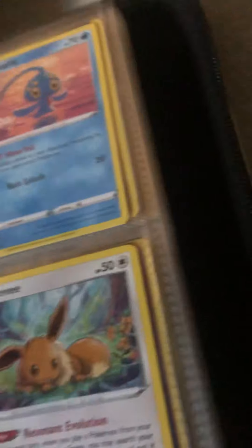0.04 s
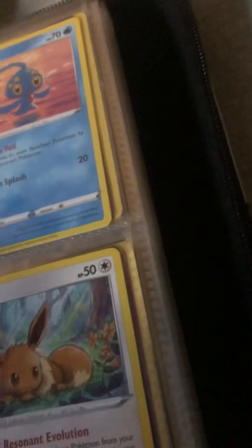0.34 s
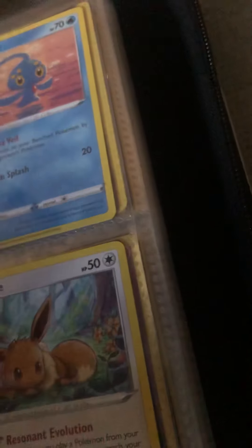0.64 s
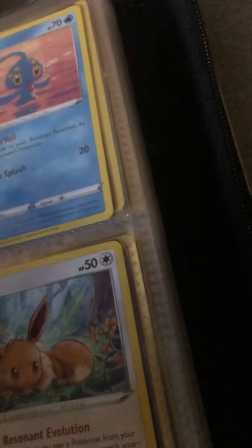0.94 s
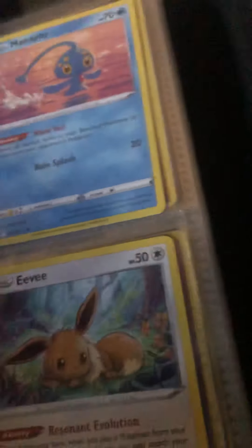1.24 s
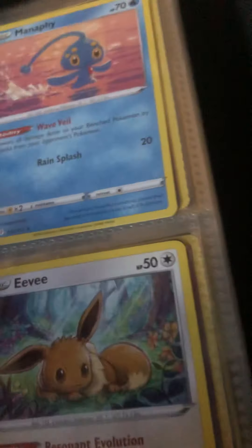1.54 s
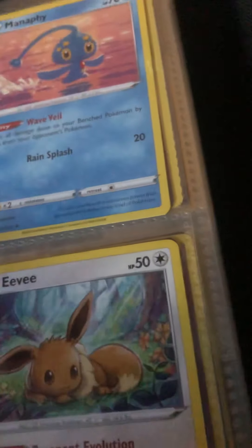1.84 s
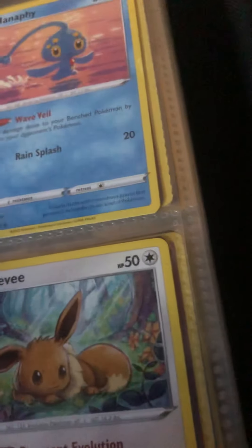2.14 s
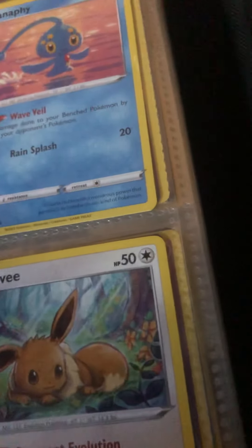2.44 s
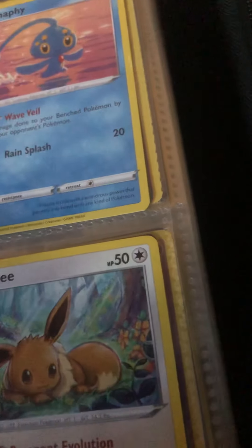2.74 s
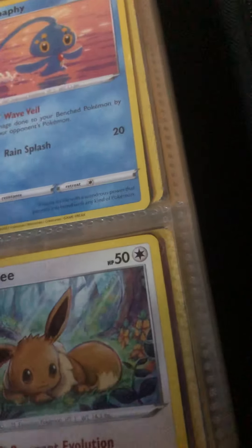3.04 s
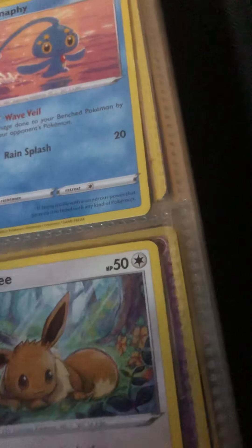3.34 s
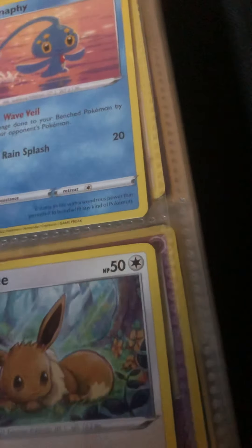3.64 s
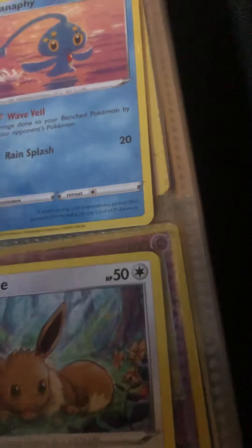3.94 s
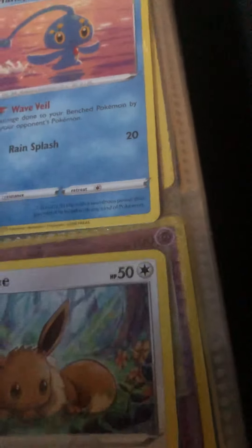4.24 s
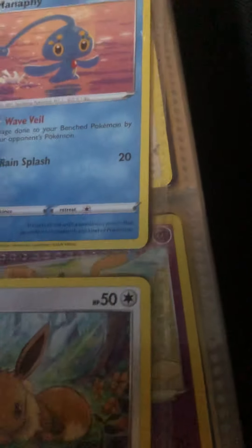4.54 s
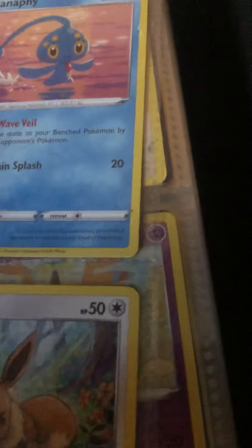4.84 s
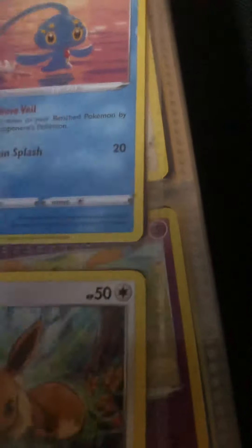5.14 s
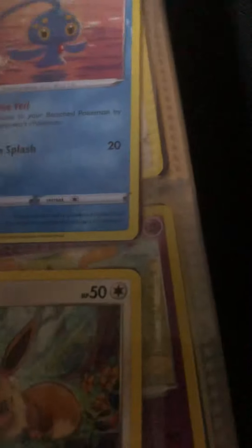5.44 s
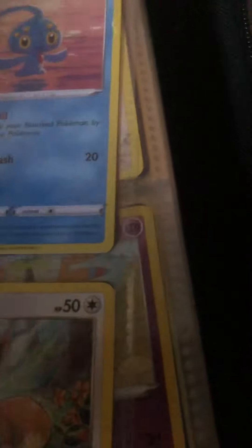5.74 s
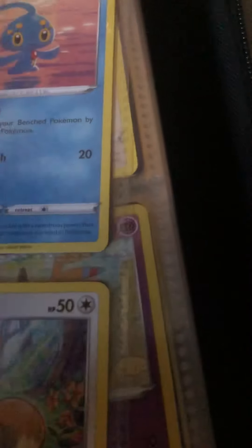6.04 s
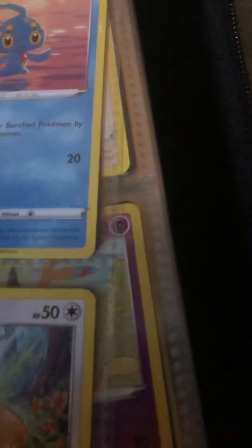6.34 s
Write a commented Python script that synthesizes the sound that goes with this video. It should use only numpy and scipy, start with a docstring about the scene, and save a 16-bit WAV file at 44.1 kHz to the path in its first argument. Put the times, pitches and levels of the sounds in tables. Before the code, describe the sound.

Plastic pocket pages full of trading cards are handled close to the microphone in a quiet room. Light, scattered crackles come first, then a short pause. The crinkling returns and builds to a cluster of sharp snaps with brief card scrapes, followed by a soft hissing slide and a few last ticks. The binder bumps dully now and then, and an appliance hums very faintly behind.

```python
"""Plastic pocket pages full of trading cards snap and crinkle, handled close by in a quiet room.
Each snap is a crease in the plastic film buckling and sending bending waves through the sheet.
Cards and sleeves catch and slip as they slide, making short scuffs, scrapes and one long glide.
The binder bumps softly when it is nudged, and an appliance hums faintly behind it all."""
import sys
import numpy as np
from scipy import signal
from scipy.fft import rfft, irfft
from scipy.io import wavfile
from scipy.ndimage import map_coordinates

SR = 44100
rng = np.random.default_rng(int(sys.argv[2]) if len(sys.argv) > 2 else 0)


def file_out(sig):
    """Save sig as 16-bit WAV at sys.argv[1]."""
    # one column per channel
    cols = np.atleast_2d(sig).T
    # limit, then scale
    lim = np.clip(cols, -1, 1)
    pcm = np.round(lim * 32767).astype(np.int16)
    wavfile.write(sys.argv[1], SR, pcm)


N = 290178
LEAD_S = 0.004  # how long a crease creaks before it jumps


def undb(db):
    """Turn decibels into a number to multiply by."""
    return 10 ** (np.asarray(db) / 20)


def unit(x):
    """Scale a sound to an average (rms) level of 1."""
    return x / np.sqrt(np.mean(x ** 2) + 1e-30)


def freqs(x):
    """The frequencies in the spectrum of x, never below 1 Hz."""
    return np.maximum(np.fft.rfftfreq(len(x), 1 / SR), 1)


def add(out, start_s, x):
    """Mix x into out, beginning at start_s."""
    i = int(start_s * SR)
    a, b = max(i, 0), min(i + len(x), N)
    if b > a:
        out[a:b] += x[a - i:b - i]


def colour(x, points):
    """Shape the tone of x along a curve of (frequency [Hz], level [dB]) points."""
    hz, db = np.transpose(points)
    gain = undb(np.interp(np.log(freqs(x)), np.log(hz), db))
    cepstrum = irfft(np.log(gain), len(x))
    # folding this in half makes the filter ring after a click, not before it
    cepstrum[1:len(x) // 2] *= 2
    cepstrum[len(x) // 2 + 1:] = 0
    return irfft(rfft(x) * np.exp(rfft(cepstrum)), len(x))


def resonance(f, hz, q):
    """How something that rings at hz answers each frequency; a higher q rings longer."""
    return 1 / (1 + 1j * q * (f / hz - hz / f))


def peaks(modes):
    """A tone curve with one steep peak for each (frequency [Hz], width [Hz], level [dB])."""
    f = np.geomspace(100, 20000, 600)
    power = sum(undb(db) ** 2 * np.abs(resonance(f, hz, hz / width)) ** 4 for hz, width, db in modes)
    return np.c_[f, 10 * np.log10(power)]


# tone of the room's air: (frequency [Hz], relative level [dB])
AIR_TONE = [(20, -64), (32, -35), (45, -11.5), (115, -14.5), (190, -7.5), (280, -11.5), (450, -16),
            (850, -22), (2300, -24), (3600, -27.5), (8100, -34.5), (16000, -40.5)]


def room_air(level_db=-63.5):
    """Still air makes a faint, low rush."""
    return undb(level_db) * unit(colour(rng.standard_normal(N), AIR_TONE))


# the notes in the appliance's hum: (frequency [Hz], level [dB])
HUM_NOTES = [(94.3, -78), (188.7, -67), (377.4, -90), (943, -78), (1509, -82.5)]


def appliance_hum(waver=0.032):
    """An appliance hums a few steady notes that waver slightly in loudness and pitch."""
    t, out = np.arange(N) / SR, np.zeros(N)
    slow = [(2, 0), (8, -10), (60, -70), (400, -120)]
    for hz, db in HUM_NOTES:
        swell = unit(colour(rng.standard_normal(N), slow))
        drift = unit(colour(rng.standard_normal(N), slow))
        note = np.sqrt(2) * np.sin(2 * np.pi * hz * t + hz / 600 * drift)
        out += undb(db) * (1 + waver * swell) * note
    return out


def room_echo(x, echo_db=-22, die_away_s=0.19, delay_s=0.0086):
    """A small furnished room adds a weak, short, duller echo."""
    t = np.arange(SR // 2) / SR
    tail = rng.standard_normal(len(t)) * undb(-60 * t / die_away_s) * (t > delay_s)
    tail = colour(tail, [(150, 6.5), (600, -8.5), (1250, -3.5), (2300, -4.5), (6000, -7), (14000, -3.5)])
    return x + undb(echo_db) * signal.fftconvolve(x, tail / np.linalg.norm(tail))[:N]


def hardness(db, soft_db=-31, hard_db=-21):
    """How hard a snap is: 0 for soft, 1 for hard, below 0 for fainter ones."""
    return (db - soft_db) / (hard_db - soft_db)


def after_snaps(soft_db, hard_db, fade_s, attack_s):
    """A loudness curve that swells and fades after each single snap, more after a hard one."""
    t, out = np.arange(SR // 4) / SR, np.zeros(N)
    shape = (1 - np.exp(-t / attack_s)) * np.exp(-t / fade_s)
    for time_s, db, *_ in FILM_SNAPS:
        add(out, time_s, undb(soft_db + (hard_db - soft_db) * hardness(db)) * shape)
    return out


# soft pushes on the binder: (time [s], level [dB], fade [s], ring of the cover [Hz])
BINDER_NUDGES = [(0.899, -54, 0.02, 187), (1.664, -51, 0.008, 280), (1.701, -53, 0.0055, 260),
                 (1.898, -52.5, 0.011, 200), (3.191, -44, 0.011, 169), (4.221, -50, 0.033, 130),
                 (5.101, -50, 0.02, 184), (5.107, -51.5, 0.012, 520), (5.171, -55, 0.061, 153),
                 (5.24, -55, 0.022, 160), (5.341, -61, 0.15, 140), (5.42, -63, 0.09, 65),
                 (5.918, -55.5, 0.04, 250), (6.002, -52.5, 0.02, 260), (6.15, -48, 0.0067, 200)]


def binder_bumps(attack_s=0.00033, ring_gain=3.1):
    """The padded cover bumps dully at a snap or a push; its note depends on where it is pushed."""
    t = np.arange(SR // 2) / SR
    cover = [(30, -32), (60, -5.5), (105, -6.5), (155, 2), (330, -7), (510, -1.5),
             (850, -39), (4000, -35)]
    bumps = after_snaps(soft_db=-52, hard_db=-39, fade_s=0.0088, attack_s=attack_s)
    out = bumps * unit(colour(rng.standard_normal(N), cover))
    for time_s, db, fade_s, hz in BINDER_NUDGES:
        rumble = colour(rng.standard_normal(len(t)), cover)
        ring = 1 + ring_gain * resonance(freqs(t), hz, q=4)
        thud = unit(irfft(rfft(rumble) * ring, len(t)))
        shape = (1 - np.exp(-t / attack_s)) * np.exp(-t / fade_s)
        add(out, time_s, undb(db) * shape * thud)
    return out


def friction(t, tone, pocket_hz, slips_per_s, spread_db, smooth, hollow, grip_db=1, grip_s=0.007):
    """Rubbing is many tiny, uneven slips under a wavering grip, echoing inside the pocket."""
    count = len(t)
    sizes = rng.standard_normal(count) * undb(spread_db * np.minimum(rng.exponential(size=count), 4))
    slips = unit((rng.random(count) < slips_per_s / SR) * sizes)
    rubbing = slips + smooth * rng.standard_normal(count)
    grip = undb(grip_db * np.interp(t / grip_s, np.arange(count), rng.standard_normal(count)))
    echoes = 1 / (1 - hollow * np.exp(-2j * np.pi * freqs(t) / pocket_hz))
    return unit(colour(irfft(rfft(rubbing * grip) * echoes), tone))


# rasp of a card edge: (frequency [times the pocket's ring], relative level [dB])
RASP_TONE = [(.08, -45.5), (.33, -4), (.55, -3.5), (.75, 1.5), (1, 4.5), (1.5, -1), (2.5, -7), (5, -28),
             (13, -28)]
# hiss of film on film: (frequency [Hz], relative level [dB])
HISS_TONE = [(500, -5.5), (2000, -1.5), (3100, 0.5), (4200, 1.5), (5900, 1), (6600, -5), (7700, -5),
             (10300, -8), (12500, -9), (16000, -14.5)]
# short slides: (peak time [s], rise [s], fall [s], rasp [dB], hiss [dB], ring of the pocket [Hz])
SLIDE_STROKES = [ (0.04, 0.085, 0.13, -66, -61.5, 1550), (0.3, 0.12, 0.29, -76, -76, 1450),
                 (.875, 0.037, .035, -65, -78, 1700), (.965, 0.036, .035, -64, -74, 1700),
                 (1.215, 0.005, .02, -65, -72, 2100), (1.89, 0.0068, 0.0037, -47.5, -56, 1750),
                 (1.9, 0.0035, 0.0046, -57, -60, 1690), (2.05, 0.1, 0.26, -78, -77, 1400),
                 (3.19, 0.07, 0.054, -58, -60.5, 1190), (3.445, 0.03, 0.064, -55.5, -58.5, 1310),
                 (3.6, 0.2, 0.16, -72, -70, 1400), (3.569, 0.039, 0.02, -54, -58, 1560),
                 (3.70, 0.024, 0.015, -60.5, -56.5, 1450), (4.008, 0.031, 0.034, -52, -57.5, 1200),
                 (4.262, 0.0083, 0.21, -63, -66.5, 1180), (4.53, 0.021, 0.032, -48, -68, 1000),
                 (4.615, 0.034, 0.046, -49.5, -56, 1150), (4.672, 0.013, 0.013, -61, -57.5, 2300),
                 (5.039, 0.11, 0.035, -78, -59.5, 1150), (5.101, 0.035, 0.022, -64.5, -60.5, 1000),
                 (5.681, 0.014, 0.022, -65, -54.5, 1500), (5.189, 0.026, 0.0085, -81, -59, 1540),
                 (5.744, 0.0062, 0.014, -68, -51.5, 1170), (5.91, 0.045, 0.043, -74, -57, 1430),
                 (6, 0.021, 0.033, -73, -53.5, 1120), (6.204, 0.022, 0.0075, -55.5, -44, 2130),
                 (6.145, 0.0093, 0.012, -61, -60, 1400), (6.343, 0.0033, 0.0055, -51, -43.5, 2150),
                 (6.516, 0.042, 0.047, -61.5, -60.5, 1050)]


def short_slides(rise_db=11, fall_db=9, edge_share=0.13, tight_db=7.5):
    """Each stroke speeds up, slows and sticks again; a tight pocket hisses brighter."""
    t, out = np.arange(16384) / SR, np.zeros(N)
    hiss_hz, hiss_shape_db = np.transpose(HISS_TONE)
    for peak_s, rise_s, fall_s, rasp_db, hiss_db, pocket_hz in SLIDE_STROKES:
        length_s = rise_s + fall_s
        contact = np.clip(np.minimum(t, length_s - t) / (edge_share * length_s), 0, 1)
        speed = contact * undb(np.interp(t, [0, rise_s, length_s], [-rise_db, 0, -fall_db]))
        tilt_db = tight_db * np.log2(pocket_hz / 1250) * np.log2(hiss_hz)
        rasp = friction(t, np.multiply(RASP_TONE, [pocket_hz, 1]), pocket_hz,
                        slips_per_s=2100, spread_db=-0.5, smooth=0.61, hollow=0.21)
        hiss = friction(t, np.c_[hiss_hz, hiss_shape_db + tilt_db], pocket_hz,
                        slips_per_s=4200, spread_db=3.5, smooth=0.52, hollow=0.061)
        add(out, peak_s - rise_s, speed * (undb(rasp_db) * rasp + undb(hiss_db) * hiss))
    return out


# where a tight pocket rings: (frequency [Hz], width [Hz], relative level [dB])
POCKET_RINGS = [(1050, 420, -6), (2080, 500, -6.5), (2880, 1000, -8.5), (4270, 700, -7), (5620, 450, -10),
                (6200, 310, -13), (7140, 1350, -17), (9300, 1300, -21), (11300, 1700, -23),
                (12600, 700, -24), (14400, 1300, -29)]
# card scrapes; a negative swell is a fade:
# (start [s], length [s], final level [dB], swell [dB], ring of the card edge [Hz])
EDGE_SCRAPES = [(4.747, 0.057, -46.5, 10.5, 1090), (4.837, 0.013, -56, -7, 1290),
                (4.86, 0.034, -33.5, 7, 1250), (5.321, 0.066, -48, 5, 955)]


def card_scrapes(ramp_s=0.0034, edge_width_hz=520):
    """A card edge rasps through a tight pocket, swelling or fading until it stops."""
    t, out = np.arange(8192) / SR, np.zeros(N)
    for start_s, length_s, db, swell_db, edge_hz in EDGE_SCRAPES:
        contact = np.clip(np.minimum(t, length_s - t) / ramp_s, 0, 1)
        pressure = contact * undb(np.interp(t, [0, length_s], [-swell_db, 0]))
        tone = peaks([(edge_hz, edge_width_hz, 0), *POCKET_RINGS])
        rasp = friction(t, tone, edge_hz, slips_per_s=3200, spread_db=-2, smooth=1, hollow=0, grip_db=1.2)
        add(out, start_s, undb(db) * pressure * rasp)
    return out


# where a card's sleeve rings: (frequency [Hz], width [Hz], relative level [dB])
SLEEVE_RINGS = [(1000, 810, -0.5), (1990, 900, 4), (2570, 330, -2), (4200, 1550, 4.5), (5670, 980, 7),
                (7740, 1300, -2.5), (9400, 1000, -1), (11400, 2000, -3), (13000, 1300, -3),
                (14700, 1400, -10)]


def card_glide(start_s=5.387, level_db=-53.5, attack_s=0.02, hold_s=0.23, fade_db_per_s=105):
    """A card slides lightly under the film, holds its speed, gets a last push and dies away."""
    t, out = np.arange(32768) / SR, np.zeros(N)
    slowing_s = np.maximum(t - attack_s - hold_s, 0)
    thumb_push_db = 5 * np.exp(-((t - 0.227) / 0.015) ** 2)
    speed = np.minimum(t / attack_s, 1) * undb(level_db + thumb_push_db - fade_db_per_s * slowing_s)
    hiss = friction(t, peaks(SLEEVE_RINGS), pocket_hz=1900, slips_per_s=5700,
                    spread_db=2.5, smooth=0.65, hollow=0, grip_db=0.5, grip_s=0.006)
    # the gap ahead of the card closes, so its breathy whistle climbs
    open_hz, closed_hz, width_hz, closing_s, whistle_db = 4450, 7500, 770, 0.14, -8
    gap_hz = open_hz + (closed_hz - open_hz) * np.minimum(t / closing_s, 1) ** 2
    steady = colour(rng.standard_normal(len(t)), peaks([(closed_hz, width_hz, 0)]))
    whistle = unit(map_coordinates(steady, [np.cumsum(gap_hz / closed_hz)]))
    add(out, start_s, speed * unit(hiss + undb(whistle_db) * whistle))
    return out


def film_rustle(pocket_hz=1400, hiss_db=-4):
    """The film rustles briefly as it relaxes after each single snap."""
    t = np.arange(N) / SR
    rasp_tone = np.multiply(RASP_TONE, [pocket_hz, 1])
    rasp = friction(t, rasp_tone, pocket_hz, slips_per_s=280, spread_db=0.5, smooth=0.3, hollow=0.12)
    hiss = friction(t, HISS_TONE, pocket_hz, slips_per_s=1300, spread_db=1, smooth=0.5, hollow=0.17)
    loudness = after_snaps(soft_db=-48, hard_db=-36.5, fade_s=0.0043, attack_s=0.00069)
    return loudness * (rasp + undb(hiss_db) * hiss)


# tone of the page as it ticks or snaps: (frequency [Hz], relative level [dB])
PAGE_TONE = [(60, -35), (200, -10), (480, -0.5), (750, -1.5), (1050, 5), (1600, 2.5), (2200, 2), (3000, -3),
             (4300, -3.5), (6200, -5.5), (7600, -1), (10400, -11.5), (12500, -7.5), (16000, -20)]


def stray_ticks(ticks_per_s=14, tick_db=-44, spread_db=4, rest_from_s=2, rest_until_s=3):
    """The film ticks faintly under the fingers, except while they rest."""
    t = np.arange(N) / SR
    handled = (t < rest_from_s) | (t > rest_until_s)
    ticks = handled * (rng.random(N) < ticks_per_s / SR)
    sizes = undb(tick_db + spread_db * np.clip(rng.standard_normal(N), -2, 2))
    return colour(ticks * sizes, PAGE_TONE)


def seam_echoes(t, strength=0.014, cycles=3.5):
    """Spectrum of a click echoing off the pocket seams; every octave lasts the same few cycles."""
    out = (t == 0) * 1.
    for hz in 250 * 2. ** np.arange(6):
        band = irfft(rfft(rng.standard_normal(len(t))) * resonance(freqs(t), hz, q=0.89))
        out += strength * np.sqrt(hz / 1000) * band * np.exp(-t * hz / cycles)
    return rfft(out)


# borders of a snap's five bands, low to high, called bass, body, bite, fizz and top: (frequency [Hz])
SNAP_BAND_EDGES = [250, 750, 2500, 6000, 10500, 16000]


def balance_bands(x, levels_db, average_s=0.005):
    """Reshape a snap's tone in three passes, bringing each band close to its level."""
    f, edges = freqs(x), np.array(SNAP_BAND_EDGES)
    centres = np.sqrt(edges[:-1] * edges[1:])
    for _ in range(3):
        energy = np.histogram(f, edges, weights=np.abs(rfft(x)) ** 2)[0] * 2 / len(x)
        current_db = 10 * np.log10(energy / (average_s * SR))
        x = colour(x, np.c_[centres, levels_db - current_db])
    return x


def snap(db, bass_db, bite_db, fizz_db, top_db, crease_hz, gap_hz, bounce, size=4096):
    """One buckle: the crease creaks, jumps, then gives way in tiny slips."""
    t = np.arange(size) / SR
    f, since_jump = freqs(t), t - LEAD_S
    # the loudest creases lie together close by (0), the softer ones all over the page (1)
    far = np.interp(db, [-38, -30], [1, 0])
    give_s = 0.0016 * 0.25 ** max(hardness(db), 0)  # a hard buckle gives way faster
    creak = far * 0.073 * np.exp(-np.abs(since_jump) / 0.0016)
    giving_way = np.exp(-np.abs(since_jump) / give_s)
    slipping = np.where(since_jump < 0, creak, giving_way)
    force = 0.21 * rng.standard_normal(size) * slipping * give_s / 0.001
    force[int(LEAD_S * SR)] += 2  # the jump itself
    crease_ring = 1 + (0.86 + 0.74 * far) * resonance(f, crease_hz, q=8.3 - 1.8 * far)
    spectrum = rfft(colour(force, PAGE_TONE)) * seam_echoes(t) * crease_ring
    # a bounce across the gap to the card behind the film hollows the treble
    spectrum *= 1 + min(bounce, 0.9) * np.exp(-2j * np.pi * f / gap_hz)
    # low bending waves travel slowly and arrive late: a falling chirp
    lag_s = 0.00457 / (1 + f / 300)
    spectrum *= np.exp(-2j * np.pi * np.cumsum(lag_s - lag_s[size // 8]) * SR / size)
    return balance_bands(irfft(spectrum), db + np.array([bass_db, 0, bite_db, fizz_db, top_db]))


# runs of small snaps; fizz and top are relative to the body:
# (start [s], end [s], snaps [count], body [dB], fizz [dB], top [dB], ring of the creases [Hz])
FOLD_RUNS = [(0.743, 0.784, 3, -62, -14, -21, 1660), (0.856, 0.889, 4, -57, -12, -18, 2200),
             (0.938, 0.966, 4, -60, -23, -28, 1820)]


def travelling_folds(gap_hz=4100, jitter=0.12, spread_db=3, spread_octaves=0.45):
    """A fold travels along the film and pops one crease after another at a nearly even pace."""
    out = np.zeros(N)
    for start_s, end_s, count, db, fizz_db, top_db, crease_hz in FOLD_RUNS:
        times, step_s = np.linspace(start_s, end_s, count, retstep=True)
        for time_s, (late, softer, higher, tighter) in zip(times, rng.standard_normal((count, 4))):
            pop = snap(db - spread_db * softer, bass_db=-13, bite_db=-4, fizz_db=fizz_db, top_db=top_db,
                       crease_hz=crease_hz * 2 ** (spread_octaves * higher),
                       gap_hz=gap_hz * 2 ** (spread_octaves * tighter), bounce=0.37)
            add(out, time_s + jitter * step_s * late - LEAD_S, pop)
    return out


# single snaps of the film; bass, bite, fizz and top are relative to the body:
# (time [s], body [dB], bass [dB], bite [dB], fizz [dB], top [dB], ring of the crease [Hz],
#  ring of the gap behind it [Hz], bounce across that gap [0-1])
FILM_SNAPS = [(0.318, -65.5, -1, 2, -3, -9.5, 1640, 5090, 0.22),
              (0.604, -65, -10, -1, -1.5, -3, 940, 3130, 0.2),
              (0.656, -51.5, -10.5, -4.5, -9, -14, 3150, 5100, 0.4),
              (0.8437, -54.5, -17, -10.5, -21, -31.0, 1580, 2310, 0.22),
              (0.877, -58.5, -4, -2, -8, -19, 1530, 2310, 0.22),
              (0.8983, -53.5, -13, -3, -11.0, -17, 2080, 4600, 0.17),
              (0.9582, -54.5, -13.0, -5, -11.5, -34, 3040, 5090, 0.2),
              (0.9738, -47, -19, 1, -4, -12, 850, 4560, 0.14),
              (0.9753, -50.5, -10, -4.5, -6, -14, 1750, 4400, 0.23),
              (1.0618, -59, -7, -3, -24, -27.5, 1430, 3460, 0.2),
              (1.1513, -59, -14, -1.5, -7, -8, 2390, 3030, 0.2),
              (1.1668, -57, -8, -2, -17.5, -22.0, 2650, 3240, 0.67),
              (1.186, -55, -16.0, -4.5, -21, -23.0, 1240, 2690, 0.4),
              (1.2007, -42.5, -17, 1, -16, -19, 2550, 2770, 0.6),
              (1.2032, -43, -22, -9, -12.5, -8.5, 1160, 2880, 0.57),
              (1.2338, -43.5, -22, -7, -11.5, -10, 2310, 5250, 0.28),
              (1.549, -54, -9, -3.0, -4.5, -21, 3260, 5260, 0.83),
              (1.6587, -45, -15, -10, -22, -35, 3150, 4600, 1),
              (1.664, -50, -14, -4, -14, -30.5, 3260, 5260, 0.26),
              (1.682, -59, -9, -6.0, -5.5, -22, 850, 5440, 0.4),
              (1.694, -53, -17, -9.0, -20.0, -35.5, 1480, 3290, 0.2),
              (1.697, -54, -7, -8, -27, -34.0, 850, 5000, 0.4),
              (1.7455, -56.5, -17, -5.0, -2.5, -7.0, 1690, 5260, 0.4),
              (1.8843, -53, -8, -3.5, -1.5, -10, 1580, 2250, 0.43),
              (1.8985, -54, -5, -8, -14, -17, 1900, 3600, 0.27),
              (3.0186, -51, -11.5, -0.5, -16.0, -35.5, 1750, 3150, 0.2),
              (3.05, -50, -12.0, -6, -30.0, -28.0, 3370, 2200, 0.35),
              (3.0997, -42, -11.5, -6, -20, -20, 1580, 5260, 0.2),
              (3.1087, -41.0, -10.5, -3.5, -26, -24.0, 3370, 2180, 0.31),
              (3.1323, -45, -13, 2, -10.0, -14.0, 1580, 3160, 0.59),
              (3.158, -57, -8, -1.0, -3, 0.0, 1880, 5000, 0.67), (3.1639, -52, -4, 1, 1, 2, 910, 2470, 0.2),
              (3.1757, -54, -2, 0.0, 2, -4, 850, 5000, 0.4),
              (3.1869, -36.5, -10, -6.5, -3, -8, 3490, 5100, 0.43),
              (3.1899, -43.5, 0, -5, -15.0, -24, 2080, 5200, 0.69),
              (3.292, -46.5, -17, -8, -22, -26, 880, 5600, 0.4),
              (3.4337, -40, -11.5, -5.5, -9, -9.5, 1180, 5180, 0.33),
              (3.698, -64, -22, 7, 0, -6.5, 1530, 2830, 0.2),
              (3.766, -58.5, -8.0, -0.5, -11, -16.5, 1430, 5260, 0.57),
              (4.064, -69.5, -13, 5, 2, 0, 1810, 5530, 0.4),
              (4.2219, -36, -3.5, -1.5, -8.5, -7, 1290, 2130, 0.13),
              (4.234, -57, -10, 1, -4, -12, 1800, 4300, 0.2),
              (4.2411, -32, -14.5, -6, -7.0, -8.5, 1290, 3350, 0.29),
              (4.247, -34, -4.5, -5, -19, -20.0, 850, 5060, 0.52),
              (4.372, -23.5, -9, -1.5, -12, -13, 1330, 4300, 0.49),
              (4.386, -31, -5.5, -3, 0, -6, 1230, 3630, 0.26),
              (4.3925, -33.5, -11.0, -12, -8, -22, 3740, 6060, 0.4),
              (4.469, -24.5, -9.5, 0.0, -1.5, -12.5, 2640, 4150, 0.61),
              (4.508, -23.5, -15.0, -0.5, -3.0, -11, 1300, 4330, 0.47),
              (4.511, -29.5, -8.5, -2, -16.5, -14, 1380, 2210, 0.3),
              (4.513, -28.5, -11.5, -8, -9, -28, 1290, 2470, 0.31),
              (4.5211, -36.5, -5, -4, -9.0, -19.5, 4440, 4450, 0.4),
              (4.5243, -39, -10.5, -8.0, -1, -14.0, 1940, 4450, 0.6),
              (4.5284, -47, -3, -5, -9, -21, 1750, 2690, 0.2),
              (4.5338, -36, -19, -8, -9, -20.5, 3490, 2310, 0.8),
              (4.538, -42, -25, -1, -17, -17.0, 2740, 5530, 0.4),
              (4.543, -43, -26, -1.5, -11.0, -25.5, 1940, 5000, 0.2),
              (4.5466, -41.5, -13, 0, -12, -20, 850, 4600, 0.2),
              (4.551, -44, -15.5, -9, -10, -23.0, 2230, 4680, 0.4),
              (4.5547, -40.5, -7.5, -4, -2, -16.0, 2230, 4530, 0.84),
              (4.555, -37.5, -19, 2, -9.5, -19.5, 1240, 2200, 0.2),
              (4.5743, -29, -20, 0, -12, -17.5, 980, 2650, 0.2),
              (4.597, -33.5, -11.5, 2.5, -11.5, -18.5, 1010, 4340, 0.2),
              (4.702, -53, -8, 2.5, -5.0, -19, 4150, 5090, 0.8),
              (5.0104, -57, -12.0, -4.5, -30, -19, 1430, 5260, 0.2),
              (6.0066, -52.5, -3.5, -1, -14, -13.0, 3150, 5180, 0.53),
              (6.1494, -49.5, -6, 5.5, 4, -14, 1380, 5780, 0.76),
              (6.34, -53.5, -15, -3.5, 2, -4, 1900, 4200, 0.18),
              (6.377, -63.5, -9.5, 5.5, 7, 2, 2560, 5230, 0.6),
              (6.5673, -50, -15.0, -2, -4.5, -7, 1880, 3230, 0.72)]


def page_snaps():
    """The handled pages buckle, one crease for each sharp snap."""
    out = np.zeros(N)
    for time_s, *buckle in FILM_SNAPS:
        add(out, time_s - LEAD_S, snap(*buckle))
    return out


def scene():
    """The pages, cards and binder echo in the room, over its air and hum."""
    background = room_air() + appliance_hum()
    handling = page_snaps() + film_rustle() + short_slides() + card_scrapes() + card_glide()
    handling += binder_bumps() + stray_ticks() + travelling_folds()
    return (background + room_echo(handling))[None]


def record(dry, low_hz=38, top_hz=16300):
    """Cut away the deepest bass and the highest treble."""
    bass_cut = signal.butter(4, low_hz, "high", fs=SR, output="sos")
    treble_cut = signal.ellip(10, 0.2, 70, top_hz, fs=SR, output="sos")
    return signal.sosfilt(treble_cut, signal.sosfilt(bass_cut, dry))


dry = scene()
out = record(dry)
file_out(out)
```